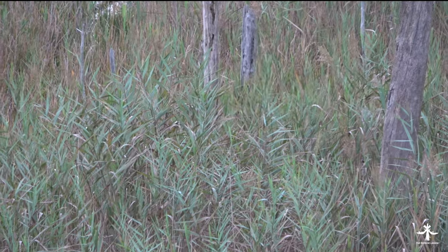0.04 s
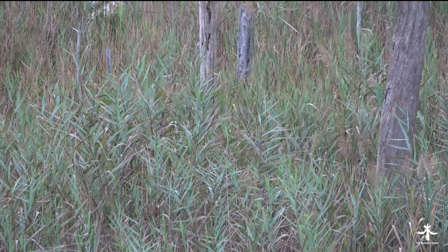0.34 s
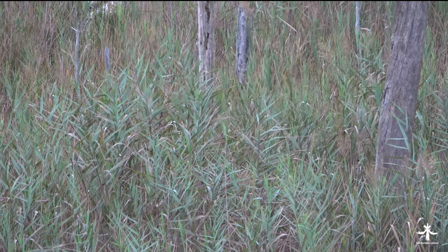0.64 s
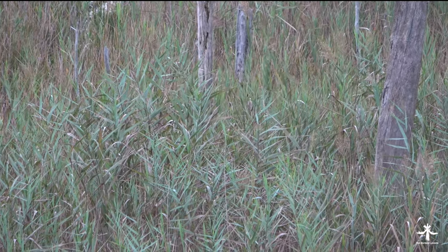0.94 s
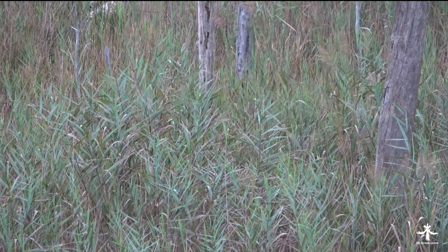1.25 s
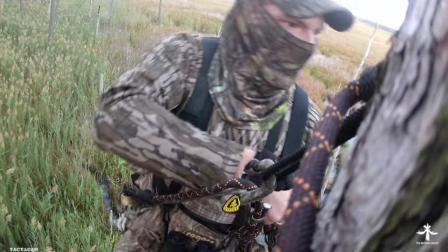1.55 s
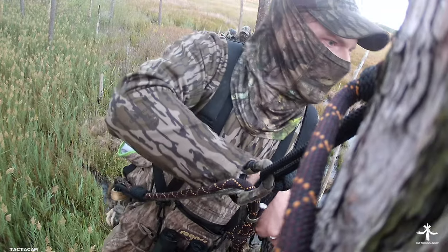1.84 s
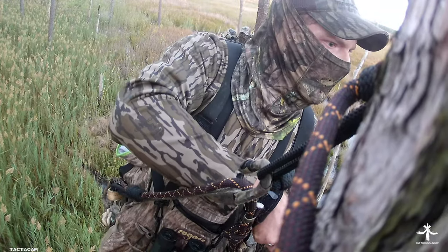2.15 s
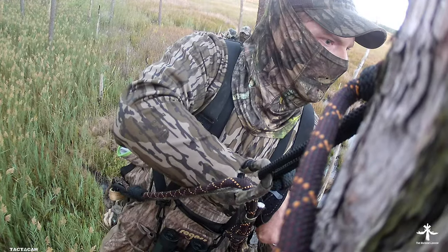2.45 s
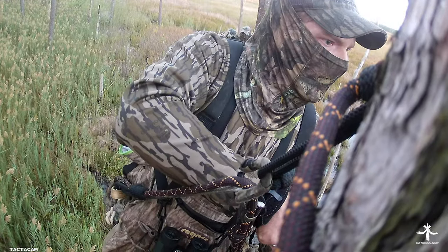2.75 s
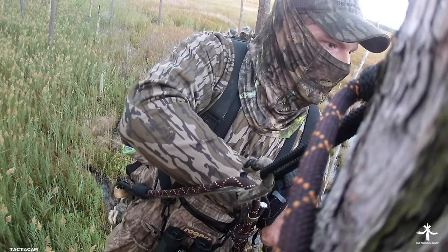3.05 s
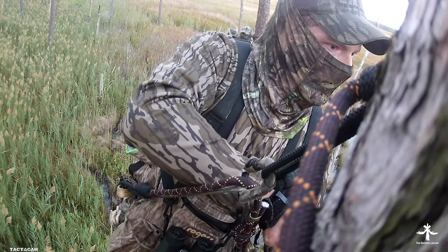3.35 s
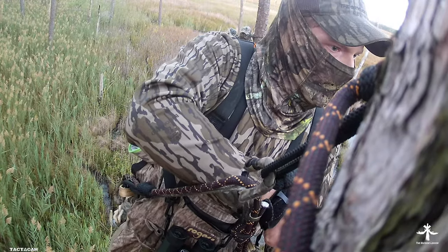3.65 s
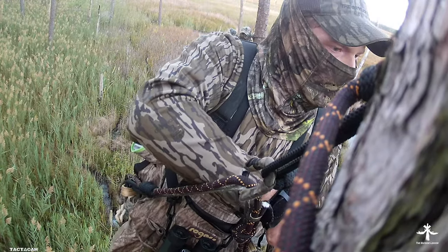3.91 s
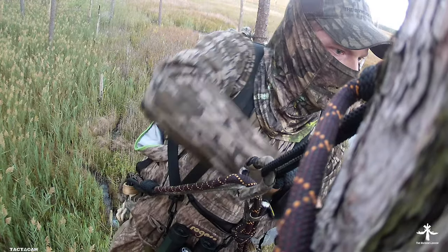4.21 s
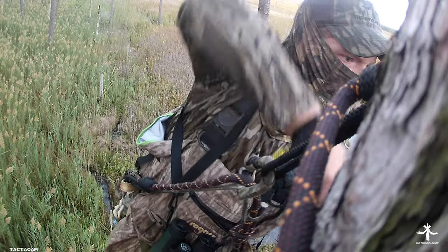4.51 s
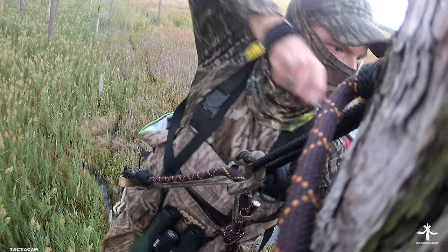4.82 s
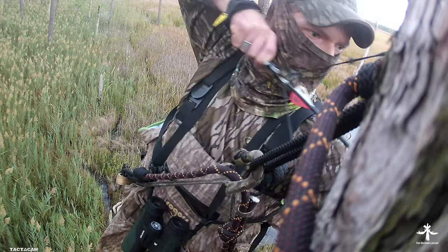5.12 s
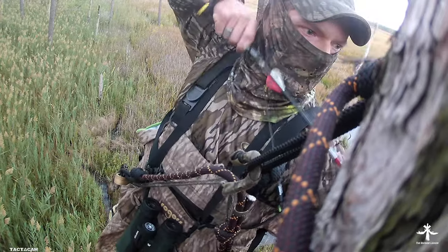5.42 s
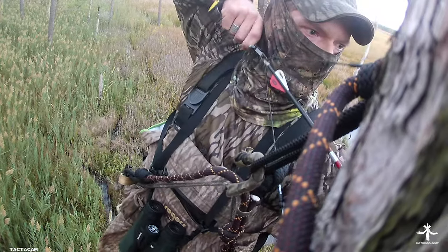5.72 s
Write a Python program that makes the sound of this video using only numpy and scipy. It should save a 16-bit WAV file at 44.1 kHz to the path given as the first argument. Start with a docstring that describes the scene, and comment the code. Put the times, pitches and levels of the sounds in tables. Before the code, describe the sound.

In a marsh, a high-pitched insect chorus drones steadily while gusts of wind rumble on the microphone and air washes softly through reeds. A distant bird gives a few short, faint whistles. Close by, a climber's gear ticks and bumps lightly on a tree stand. Near the end a handled arrow makes one sharp click, followed by two faint calls and a last gust.

```python
"""A marsh from a tree stand, 6 s. Throughout, insects scrape their wings in two high bands, air washes
through reeds, and dry leaves and cloth patter. Gusts buffet the microphone from the start.
From 0.5 s a far bird whistles short arched calls and a climber's gear ticks and bumps softly.
At 4.9 s a handled arrow gives one sharp click. Two faint calls and a last gust follow."""
import sys
import numpy as np
from scipy import signal
from scipy.fft import rfft, irfft
from scipy.io import wavfile
from scipy.ndimage import uniform_filter1d

SR = 44100
rng = np.random.default_rng(int(sys.argv[2]) if len(sys.argv) > 2 else 0)


def generate_wav(signal):
    """Clip the signal to [-1, 1] and save it as 16-bit WAV at the path in sys.argv[1]."""
    frames = np.transpose(np.atleast_2d(signal))
    scaled = np.clip(frames, -1, 1) * 32767
    pcm = np.round(scaled).astype(np.int16)
    wavfile.write(sys.argv[1], SR, pcm)


N = 263277
TIME_S = np.arange(N) / SR
FREQ_HZ = np.fft.rfftfreq(N, 1 / SR)

# Wing resonances and overtones. Each row: centre in Hz, spread in Hz, relative level in dB.
WING_BANDS = [(3650, 254, -17), (5334, 243, -3.5), (5542, 178, 1), (5895, 124, -4), (7044, 320, -5.5),
              (7160, 320, -7.5), (7446, 184, -5), (8040, 210, -26), (11080, 450, -31.5), (14200, 870, -31)]
# Near insects. Each row: start in seconds, end in seconds, pitch in Hz, width in Hz, level in dB.
NEAR_INSECTS = [(0, 5.97, 8247, 30, -66.5), (0, 5.97, 7990, 40, -66), (0, 5.97, 7080, 20, -59),
                (0, .45, 8430, 130, -64)]
# Slow swell of chorus and reeds. Each row: time in seconds, relative level in dB.
SWELL = [(0, 0.74), (.65, 1), (1.1, 0), (1.9, 1.5), (2.4, 0.8), (3.4, -1.1), (4.3, -0.55), (5, 1),
         (5.3, -1), (5.97, 1)]
# Gusts. Each row: peak time in seconds, length in seconds, relative level in dB.
GUSTS = [(0.02, 0.082, -21.5), (0.814, .2, -17.5), (1.157, 0.15, -20.5), (1.464, 0.15, -20),
         (1.742, 0.075, -14.5), (2.035, 0.44, -21), (2.508, 0.29, -15), (3.16, 0.25, -18.5),
         (3.91, 0.13, -15.5), (4.272, 0.3, -17.5), (4.633, 0.11, -25.5), (4.947, 0.18, -21),
         (5.162, 0.092, -14), (5.923, 0.31, -16.5)]
# Spectra of large eddies, gusts, housing eddies and air in reeds.
# Each row: frequency in Hz, relative density in dB.
SWAY_SPECTRUM = [(2, -37), (6, -18.5), (9, 2.5), (18, 1), (25, -15), (50, -60), (200, -110)]
BUFFET_SPECTRUM = [(15, -14), (26, 5.5), (35, -0.5), (50, -10.5), (65, -18), (100, -50), (400, -100)]
HOUSING_SPECTRUM = [(40, -19), (65, 3), (90, -4), (120, -4.5), (145, -15.5), (200, -17.5), (400, -33),
                    (1500, -88)]
REED_SPECTRUM = [(30, 3), (115, 1.5), (170, -0.5), (270, -2.5), (650, -5), (1000, -9), (1400, -9),
                 (1750, -15), (2700, -17.5), (4500, -18.5), (8800, -30.5), (16000, -40.5)]
# Ticks of gear and bark. Each row: start in seconds, peak in dB, ring in Hz.
TICKS = [(0.524, -33, 4060), (1.0834, -30.5, 4320), (1.5962, -36, 3130), (1.937, -33, 2410),
         (2.171, -35.5, 3900), (2.372, -24, 3860), (2.422, -29.5, 1400), (2.655, -31, 3360),
         (2.92, -32.5, 3180), (2.9807, -34, 2900), (3.557, -26.5, 3850), (4.0654, -34.5, 2700),
         (4.8828, -30, 2220), (4.9212, -24, 3700), (5.1543, -28.5, 3100), (5.3416, -29, 3800),
         (5.4086, -27.5, 2630), (5.457, -29.5, 1930)]
# Tick resonance; small hard parts ring more purely. Each row: ring in Hz, width in Hz.
TICK_WIDTHS = [(3000, 1230), (3900, 610)]
# Bumps on the stand. Each row: start in seconds, relative peak in dB, ring in Hz.
BUMPS = [(0.7824, -31.5, 170), (1.0513, -23.5, 373), (1.06, -33, 178), (1.1826, -33, 210),
         (1.8398, -28.5, 730), (3.0749, -31, 497), (3.214, -34, 160), (5.1247, -31, 260)]
# Arrow click. Each row: start in seconds, relative peak in dB.
CLICKS = [(4.863, -5.5)]
# Shaft modes. Each row: frequency in Hz, relative level in dB, 60 dB decay time in seconds.
ARROW_MODES = [(770, -2, 0.011), (1280, -1.5, 0.011), (1790, -1, 0.009), (2140, 11, 0.0034),
               (3440, 5, 0.0039)]
# Bird calls. Each row: start in seconds, length in seconds, top pitch in Hz,
# arch as a share of the pitch, level in dB.
BIRD_CALLS = [(.515, .085, 1460, .12, -49.5), (.69, .09, 3030, .08, -55.5), (2.06, .11, 1490, .19, -44.5),
              (3.175, .12, 1430, .2, -49.5), (5.22, .25, 3320, .015, -56), (5.88, .06, 3080, .05, -56.5)]


def insect_chorus(level_db=-34.5, throb_db=0.19, drift_db=0.35, stroke_depth=0.1, stroke_hz=90):
    """Many wings scrape out of step; each band pulses with wing strokes and throbs on its own."""
    out = np.zeros(N)
    for hz, spread_hz, db in WING_BANDS:
        song = noise(np.exp(-((FREQ_HZ - hz) / spread_hz / 2) ** 2)) * np.sqrt(spread_hz)
        strokes = 1 + stroke_depth * noise(np.exp(-(FREQ_HZ / stroke_hz - 1) ** 2))
        out += gain(db + throb_db * drift(22) + drift_db * drift(1.1)) * strokes * song
    return gain(level_db) * swell() * unit_rms(out)


def near_insects(waver_db=2):
    """Nearer insects hold thin wavering lines at the top of the chorus."""
    out = np.zeros(N)
    for start_s, end_s, hz, width_hz, db in NEAR_INSECTS:
        trill = noise(np.exp(-((FREQ_HZ - hz) / width_hz) ** 2)) * gain(db + waver_db * drift(3.7))
        singing = (TIME_S >= start_s) & (TIME_S <= end_s)
        out += trill * uniform_filter1d(singing.astype(float), size=3000)
    return out


def wind(sway_db=-2, buffet_db=1, housing_db=-26):
    """Large eddies sway the diaphragm, gusts buffet it, small eddies flutter at the housing."""
    strength = wind_strength()
    sway = gain(sway_db) * strength ** 0.46 * eddies(SWAY_SPECTRUM)
    buffet = gain(buffet_db) * strength * eddies(BUFFET_SPECTRUM)
    flutter = gain(housing_db) * strength ** 0.64 * eddies(HOUSING_SPECTRUM)
    return (sway + buffet + flutter) * signal.windows.tukey(N, 3000 / N)


def wind_strength(lull_db=-26.5):
    """Each gust swells and dies as a bell curve over a steady lull."""
    gust_power = sum(gain(db) ** 2 * np.exp(-2 * np.pi * ((TIME_S - peak_s) / length_s) ** 2)
                     for peak_s, length_s, db in GUSTS)
    return np.sqrt(gain(lull_db) ** 2 + gust_power)


def eddies(spectrum):
    """Turbulent pressure of one eddy size, levelled over about 0.1 s."""
    pressure = noise(spectral_gain(spectrum))
    envelope = np.sqrt(uniform_filter1d(abs(signal.hilbert(pressure)) ** 2, size=5000))
    return unit_rms(pressure / uniform_filter1d(envelope, size=2000))


def arrow(trim_db=-3):
    """A knocked shaft rings briefly in its modes."""
    out, t = np.zeros(N), TIME_S[:4096]
    modes = -sum(gain(db - 60 * t / t60_s) * np.sin(2 * np.pi * hz * t) for hz, db, t60_s in ARROW_MODES)
    soft_contact = signal.butter(4, 4300, fs=SR, output="sos")
    thin_shaft = signal.butter(2, 350, "high", fs=SR, output="sos")  # radiates no bass
    click = signal.sosfilt(thin_shaft, signal.sosfilt(soft_contact, modes))
    for start_s, db in CLICKS:
        add(out, start_s, gain(db + trim_db) * click / abs(click).max())
    return out


def gear(bump_trim_db=1):
    """Gear and bark tick; blows on the stand give dull bumps."""
    out = np.zeros(N)
    for start_s, db, hz in TICKS:
        width_hz = np.interp(hz, *np.transpose(TICK_WIDTHS))
        add(out, start_s, gain(db) * knock(hz, width_hz, scrape_s=0.0059, scrape=0.16, snap=0.28))
    for start_s, db, hz in BUMPS:
        add(out, start_s, gain(db + bump_trim_db) * knock(hz, 0.33 * hz, scrape_s=0.013, scrape=0.0095))
    return out


def knock(hz, width_hz, scrape_s, scrape, snap=0):
    """A blow and brief scrape ring one resonance, with an optional dry snap an octave down; peak 1."""
    t = TIME_S[:4096]
    force = scrape * rng.standard_normal(len(t)) * np.exp(-t / scrape_s)
    force[0] += 1
    sound = ring(ring(force, hz, width_hz), hz, 2 * width_hz)
    sound += snap * ring(ring(force, hz / 2, hz / 2), hz / 2, hz / 2)
    return sound / abs(sound).max()


def bird(rasp_depth=0.7, wobble_depth=0.15):
    """Each call is a hoarse whistle that rises and falls."""
    out, rasp, wobble = np.zeros(N), drift(130), drift(130)
    for start_s, length_s, top_hz, arch, db in BIRD_CALLS:
        position = np.linspace(-1, 1, int(length_s * SR))
        span = np.arange(len(position)) + int(start_s * SR)
        pitch_hz = top_hz * (1 - arch * (position ** 2 + wobble_depth * wobble[span]))
        whistle = np.sin(2 * np.pi * np.cumsum(pitch_hz) / SR) * (1 + rasp_depth * rasp[span])
        add(out, start_s, gain(db) * unit_rms(whistle * signal.windows.tukey(len(span), 0.3)))
    return out


def reeds(level_db=-41.5, flutter_db=1.04):
    """Air washes through the leaves with a slight flutter."""
    envelope = gain(level_db + flutter_db * drift(37)) * swell() ** 1.36
    return envelope * noise(spectral_gain(REED_SPECTRUM))


def leaf_patter(level_db=-61, spread_db=2.5, crisp_db=-14, crisp_hz=9000, band_snaps_per_s=11):
    """Dry leaves and cloth snap faintly at many pitches, each with a crisp top."""
    out = np.zeros(N)
    for hz in np.geomspace(1200, 4300, num=7):
        snaps = rng.random(N) < band_snaps_per_s / SR
        force = snaps * gain(spread_db * np.minimum(rng.exponential(1, N), 2))
        out += ring(ring(force, hz, width_hz=890), hz, width_hz=1600)
        out += gain(crisp_db) * ring(force, crisp_hz, crisp_hz / 2)
    return gain(level_db) * unit_rms(out)


def tree_echo(x, t60_s=0.48, taps_per_s=1500, delay_s=0.006):
    """Trunks and reeds scatter a short, thin echo."""
    t = TIME_S[:SR // 2]
    taps = rng.standard_normal(len(t)) * (rng.random(len(t)) < taps_per_s / SR)
    taps *= gain(-60 * t / t60_s) * (t > delay_s)
    return signal.fftconvolve(x, taps / np.linalg.norm(taps))[:N]


def swell():
    """The marsh's slow swell as gain per sample."""
    return gain(np.interp(TIME_S, *np.transpose(SWELL)))


def gain(db):
    """Decibels to amplitude."""
    return 10 ** (np.asarray(db) / 20)


def unit_rms(x):
    """Scales to rms 1."""
    return x / np.sqrt(np.mean(x ** 2) + 1e-20)


def spectral_gain(spectrum):
    """Spectrum table to gain per frequency bin."""
    hz, db = np.transpose(spectrum)
    return gain(np.interp(np.log(FREQ_HZ + 1), np.log(hz + 1), db))


def noise(bin_gains):
    """Shaped noise, rms 1."""
    return unit_rms(irfft(rfft(rng.standard_normal(N)) * bin_gains, N))


def drift(rate_hz):
    """Random wander up to about rate_hz, rms 1."""
    return noise(np.exp(-(FREQ_HZ / rate_hz) ** 2))


def ring(x, hz, width_hz):
    """Two-pole resonance."""
    return signal.lfilter(*signal.iirpeak(hz, hz / max(width_hz, 20), fs=SR), x)


def add(mix, start_s, sound):
    """Mixes a sound in at start_s."""
    part = mix[max(round(start_s * SR), 0):][:len(sound)]
    part += sound[:len(part)]


def scene(echo_db=-13):
    """Mono mix; calls and knocks echo faintly from the trees."""
    events = bird() + gear() + arrow()
    ambience = wind() + reeds() + leaf_patter() + insect_chorus() + near_insects()
    return (ambience + events + gain(echo_db) * tree_echo(events))[None]


def record(dry, cutoff_hz=15750):
    """Soft clip at full scale, then low-pass."""
    clipped = dry / (1 + dry ** 8) ** (1 / 8)
    lowpass = signal.firwin(511, cutoff_hz, window=("kaiser", 9), fs=SR)
    return signal.oaconvolve(clipped, lowpass[None], "same")


dry = scene()
out = record(dry)
generate_wav(out)
```